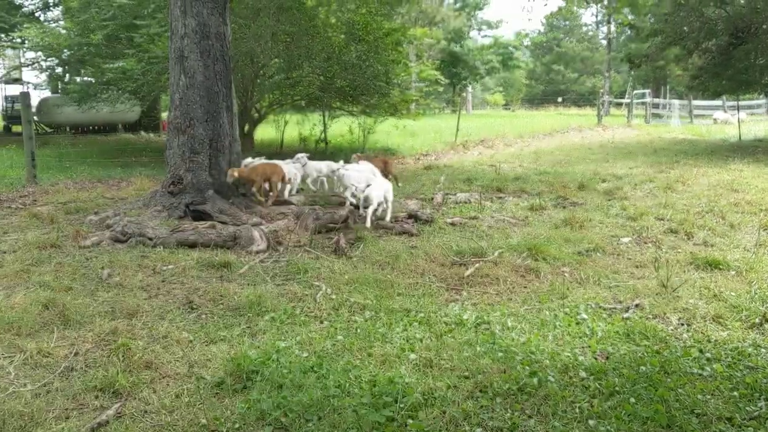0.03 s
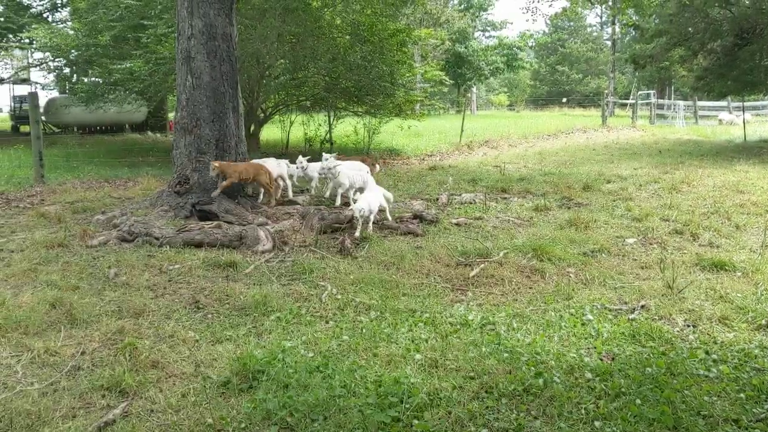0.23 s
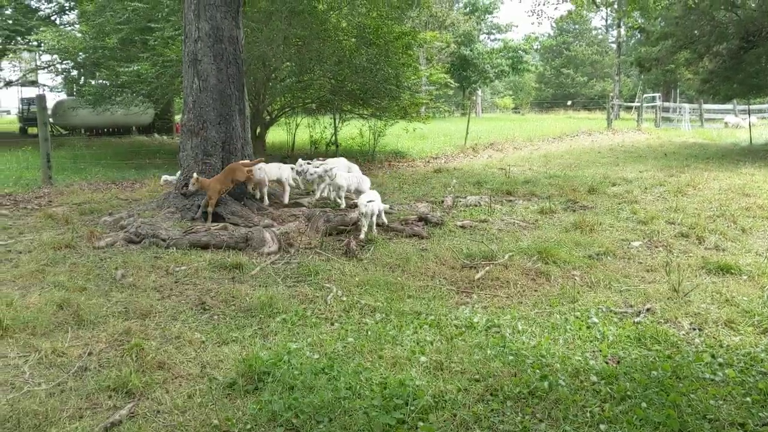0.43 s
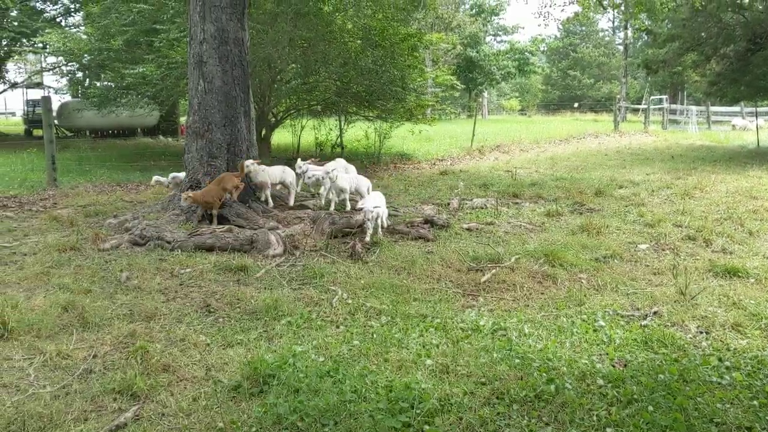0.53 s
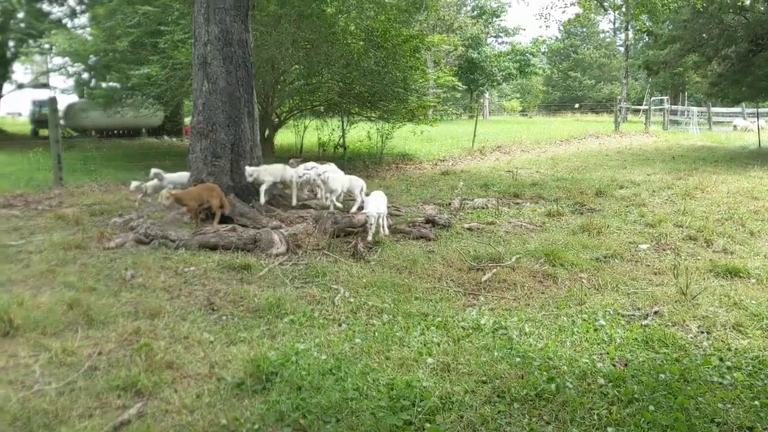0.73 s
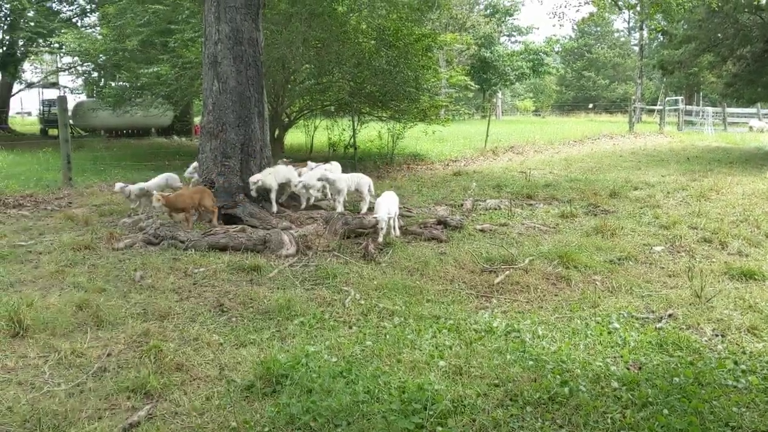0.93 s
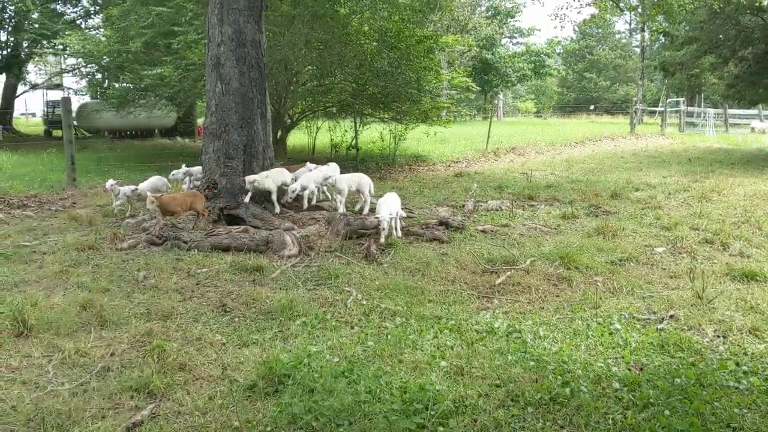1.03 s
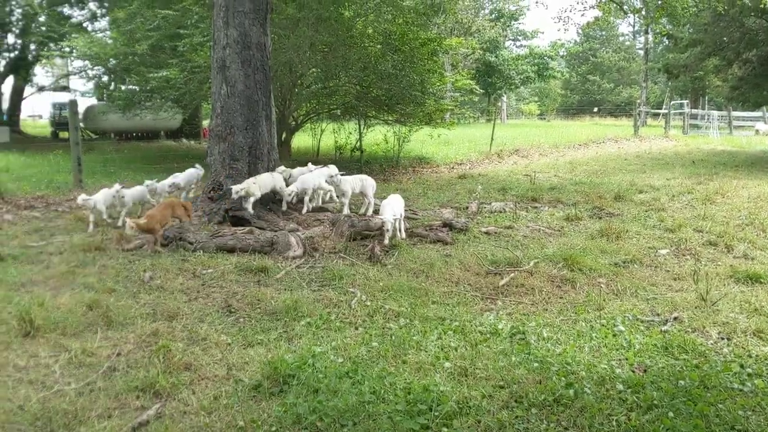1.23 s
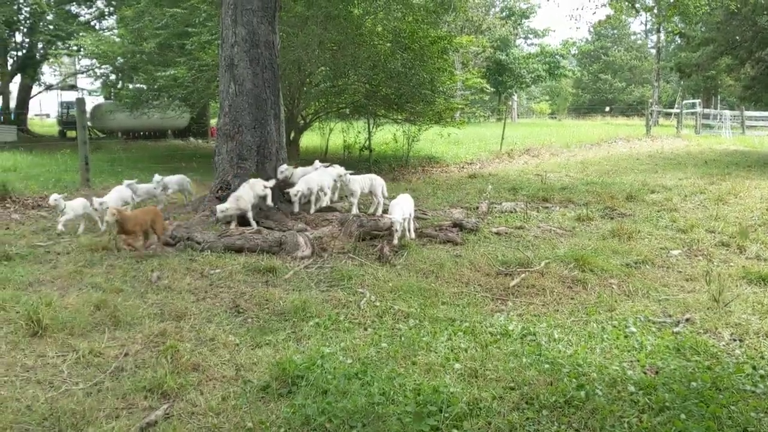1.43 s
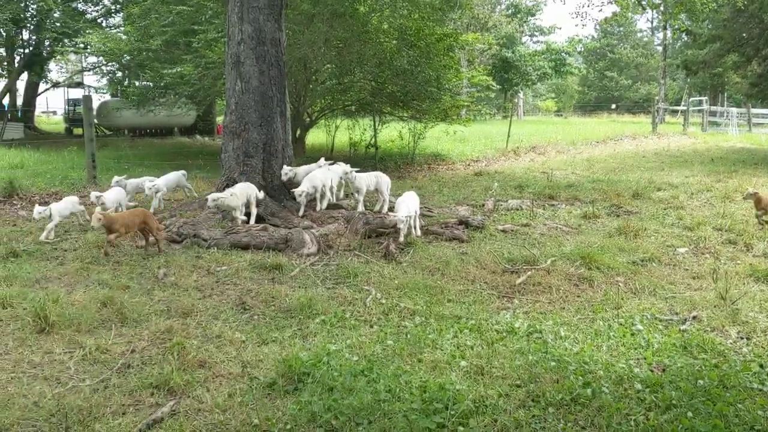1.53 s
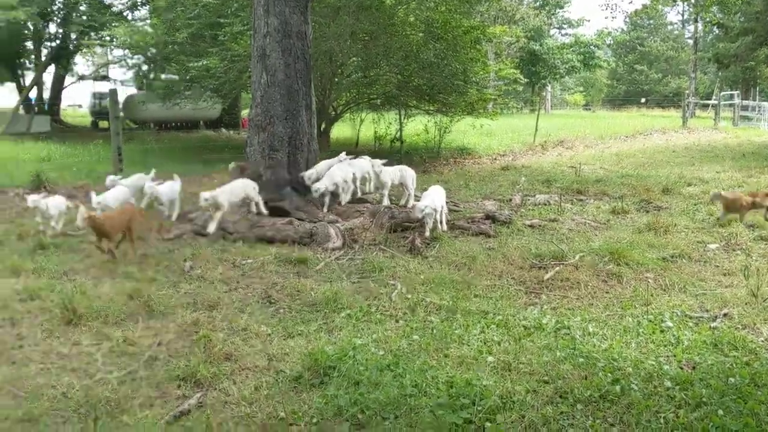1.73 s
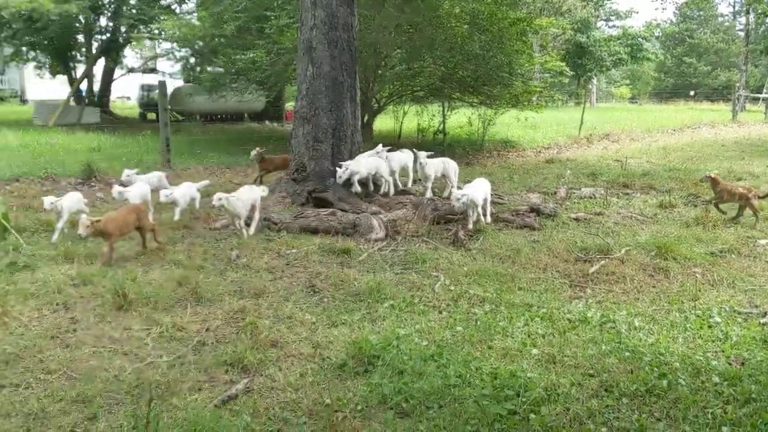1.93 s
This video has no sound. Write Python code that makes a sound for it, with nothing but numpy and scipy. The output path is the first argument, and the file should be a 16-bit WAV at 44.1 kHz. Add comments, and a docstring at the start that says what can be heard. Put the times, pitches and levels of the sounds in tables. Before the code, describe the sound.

A lamb gives a quavering bleat, then a farther one answers in a quiet pasture.

```python
"""Two lambs bleat to the left in a pasture ringed by trees: a near one with a quaver, then a farther,
steadier one. Each bleat is a source and a filter: glottal pulses and puffs of air excite the resonances
of throat and mouth, and ground and trees reflect the sound. A distant bird whistles one phrase twice,
insects stridulate in the grass, and hooves thud softly over a low outdoor rumble."""
import sys
import numpy as np
from scipy import signal
from scipy.fft import rfft, irfft
from scipy.io import wavfile
from scipy.ndimage import uniform_filter1d

SR = 44100
rng = np.random.default_rng(int(sys.argv[2]) if len(sys.argv) > 2 else 0)


def dump_mix(stems):
    """Bounce the given channels to the path in sys.argv[1] as a 16-bit WAV at rate SR."""
    frames = np.atleast_2d(stems).T  # one column per channel
    limited = np.clip(frames, -1, 1)  # hard clip at full scale
    pcm = np.round(limited * 32767).astype(np.int16)
    wavfile.write(sys.argv[1], SR, pcm)


N = 88200
T, HZ = np.arange(N) / SR, np.fft.rfftfreq(N, 1 / SR)


def amp(db):
    """Amplitude ratio of a level in decibels."""
    return 10 ** (np.asarray(db) / 20)


def unit_rms(x):
    """Normalisation to rms 1."""
    return x / np.sqrt(np.mean(x ** 2) + 1e-20)


def at_freq(points, hz):
    """Interpolation of a table on a log-frequency axis."""
    f, value = np.transpose(points)
    return np.interp(np.log(hz + 1), np.log(f + 1), value)


def curves(rows):
    """Linear interpolation of each column of a time table."""
    times, *columns = np.transpose(rows)
    return [np.interp(T, times, column) for column in columns]


def gate(start, end, edge_s=0.0032):
    """Trapezoidal window between two times."""
    return np.clip(np.minimum(T - start, end - T) / edge_s, 0, 1)


def noise(gain):
    """Spectrally shaped Gaussian noise of rms 1."""
    return unit_rms(irfft(rfft(rng.standard_normal(N)) * gain, N))


def wander(rate_hz):
    """Random modulation: low-pass noise of rms 1."""
    return noise(1 / (1 + (HZ / rate_hz) ** 4))


def highpass(x, hz):
    """Steep zero-phase high-pass."""
    return irfft(rfft(x) / (1 + (hz / (HZ + 1)) ** 16), N)


def delay(x, seconds):
    """Travel time as a linear phase shift."""
    return irfft(rfft(x) * np.exp(-2j * np.pi * HZ * seconds), N) * (T >= seconds)


def colour(x, points):
    """Minimum-phase filter: each pulse rings after it strikes."""
    log_gain = np.log(amp(at_freq(points, abs(np.fft.fftfreq(4096, 1 / SR)))))
    response = np.fft.ifft(np.exp(np.conj(signal.hilbert(log_gain)))).real[:2048]
    return signal.fftconvolve(x, response)[:N]


def resonate(x, hz, width_hz):
    """Damped resonator whose centre follows the curve hz."""
    carrier = np.exp(2j * np.pi * np.cumsum(hz) / SR)
    pole = np.exp(-np.pi * width_hz / SR)
    return 2 * (carrier * signal.lfilter([1 - pole], [1, -pole], x / carrier)).real


# Spectral density of the outdoor air: f/Hz, relative level/dB
AIR_SPECTRUM = [(20, 2), (40, 0), (70, 2), (130, -4), (220, -9.5), (400, -12.5), (800, -19), (1600, -22),
                (3200, -20.5), (5700, -19.5), (6500, -24), (9000, -24.5), (12000, -26), (15500, -27)]
# Likeness of the two channels: f/Hz, correlation
AIR_CORRELATION = [(60, 0.93), (150, 0.9), (300, 0.086), (700, 0.31), (2000, 0.068), (10000, 0.067)]
# Left minus right: f/Hz, level/dB
AIR_LEAN = [(100, 0.25), (400, 4.8), (2000, 2.6), (5000, 7.2), (12000, 8.9)]


def air(level_db=-59.5, patch_db=1.8):
    """Partial coherence: both channels share a low rumble, but little of the patchy rustle of leaves."""
    frames, hz = N // 256 + 5, np.fft.rfftfreq(1024, 1 / SR)
    a, b, c, d, patches = rng.standard_normal((frames, 513, 5)).T
    patches = unit_rms(uniform_filter1d(uniform_filter1d(patches, size=12, axis=0), size=12, axis=1))
    correlation = at_freq(AIR_CORRELATION, hz)[:, None]
    left = a + 1j * b
    right = correlation * left + np.sqrt(1 - correlation ** 2) * (c + 1j * d)
    lean = amp(at_freq(AIR_LEAN, hz) / 2)[:, None]
    spectra = np.array([left * lean, right / lean])
    spectra *= amp(at_freq(AIR_SPECTRUM, hz)[:, None] + patch_db * patches)
    return amp(level_db) * unit_rms(signal.istft(spectra, nperseg=1024, noverlap=768)[1][:, :N])


# Hoof strikes: t/s, level/dB, centre f/Hz
HOOF_STRIKES = [(0.126, -67.5, 420), (0.361, -61.5, 590), (.435, -53, 920), (.584, -54.5, 200),
                (0.597, -68, 540), (.988, -54, 191), (1.224, -56, 204), (1.291, -57.5, 236),
                (1.387, -62.5, 170), (1.532, -58, 215)]


def hooves(rise_s=0.0049, width_octaves=.45):
    """Damped impact: each knock on turf and roots is a short, dull burst of band noise."""
    thuds = np.zeros(N)
    for start, db, hz in HOOF_STRIKES:
        age = np.maximum(T - start, 0) / rise_s
        band = np.exp(-.5 * (np.log2((HZ + 1) / hz) / width_octaves) ** 2)
        thuds += amp(db) * age * np.exp(1 - age) * noise(band)
    return thuds * amp([[1.5], [-1.5]])


# Envelope of the insect chorus: t/s, relative level/dB
CHORUS_SWELL = [(0, -62.5), (.1, -61.5), (.17, -63), (.8, -63), (.93, -64), (1.01, -60), (1.12, -65.5),
                (1.22, -60.5), (1.33, -65), (1.55, -64.5), (1.83, -63), (2, -62)]
# One insect's chirp peaks: t/s, relative level/dB
CHIRP_PEAKS = [(.08, -68), (0.876, -68), (1.083, -63), (1.27, -65), (1.42, -70), (1.58, -66), (1.754, -64),
               (1.896, -64.5)]


def insects(chorus_hz=9670, chirp_hz=10770, chirp_s=0.014, flutter_db=0.4):
    """Stridulation as modulated narrow-band noise: a sizzling chorus, and one insect chirping above it."""
    def band(hz, width_hz):
        return noise(1 / (1 + ((HZ - hz) / width_hz) ** 2 / 2) ** 2)

    chirps = sum(amp(db) * np.exp(-.5 * ((T - peak) / chirp_s) ** 2) for peak, db in CHIRP_PEAKS)
    chorus = amp(curves(CHORUS_SWELL)[0] + flutter_db * wander(77))
    sides = [chorus * band(chorus_hz, 500) + chirps * band(chirp_hz, 350) for _ in range(2)]
    return amp([[4], [-7]]) * np.array(sides)


# Reverberation time of the tree line: f/Hz, T60/s
TREE_DECAY = [(300, 0.1), (1500, 1.0), (3500, 0.77), (6000, 0.65), (12000, 1.1)]
# Colour of its echoes: f/Hz, gain/dB
TREE_RESPONSE = [(300, -1), (900, 1.5), (1400, 2), (2200, -5.5), (3450, -6), (6000, 3.5), (9000, -10),
                 (15000, -19)]


def trees(x, stir_rad=1.7, stir_hz=19):
    """Diffuse scattering, unrelated in the two channels; moving leaves modulate the echoes' phase."""
    taps = rng.standard_normal((2, SR)) * (rng.random((2, SR)) < .05)
    taps *= np.minimum(T[:SR] / 0.0026, 1)
    hz, t, spectra = signal.stft(taps, SR, nperseg=256)
    spectra *= amp(-60 * t / at_freq(TREE_DECAY, hz)[:, None])
    tail = signal.istft(spectra, SR, nperseg=256)[1]
    tail /= np.linalg.norm(tail, axis=1, keepdims=True)
    stirred = (signal.hilbert(x) * np.exp(1j * stir_rad * wander(stir_hz))).real
    return signal.fftconvolve(colour(stirred, TREE_RESPONSE)[None], tail, axes=1)[:, :N]


# The bird's phrase, one list per note: t/s within the phrase, f/Hz, relative level/dB
BIRD_NOTES = [
    [(0, 2930, -14), (.012, 2810, 4.5), (.028, 2730, -14)],
    [(.037, 3177, -9), (.055, 3220, 7), (.073, 3700, -6.5)],
    [(.108, 2228, -6.5), (.15, 2304, 6.5), (.172, 2660, -0.5), (.183, 2670, 11)],
    [(.19, 2884, -9), (.201, 2650, 7.5), (.214, 2565, -2)],
    [(.245, 2203, -6.5), (.272, 2250, 4), (.32, 2185, -4.5), (.355, 1700, -9)],
]
# Phrase onsets: t/s, level/dB, pitch factor, length factor
BIRD_PHRASES = [(1.084, -59, 1., 1.), (1.55, -55, 0.98, 1.01)]


def bird(flutter=.25, flutter_hz=90, reverb_db=-3.5):
    """Multipath fading: five gliding whistles, sung twice, flutter on the long way through the leaves."""
    song = np.zeros(N)
    for start, db, pitch, stretch in BIRD_PHRASES:
        for note in BIRD_NOTES:
            rows = [(start + t * stretch, hz * pitch, db + level) for t, hz, level in note]
            hz, level_db = curves(rows)
            song += gate(rows[0][0], rows[-1][0]) * amp(level_db) * np.sin(2 * np.pi * np.cumsum(hz) / SR)
    fading = 1 + flutter * (wander(flutter_hz) + 1j * wander(flutter_hz))
    song = (signal.hilbert(song) * fading).real
    return song * amp([[3.5], [-3.5]]) + amp(reverb_db) * trees(song)


def grass(x, decay_s=0.0035):
    """Ground scattering: a few milliseconds of treble fill the gaps between pulses."""
    burst = rng.standard_normal(N) * np.exp(-T / decay_s) * gate(.0005, 1, edge_s=.001)
    scatter = highpass(burst, hz=2500)[:4096]
    return signal.fftconvolve(x, scatter / np.linalg.norm(scatter))[:N]


# Right channel relative to left: f/Hz, gain/dB
RIGHT_SHADOW = [(100, -16), (400, -7), (750, -19), (1300, -8), (2400, -3.5), (4400, -15), (8000, -7.5),
                (15000, -18)]
# Echoes from ground and trunks: delay t/s, left gain/dB, right gain/dB
REFLECTIONS = [(0.012, -13, -17), (.031, -24, -21.5), (.058, -16, -32.5), (.104, -27, -33)]


def pasture(x, right_lag_s=0.00017, reverb_db=-13.5, wood_db=-23):
    """Shadowing and reflection: a call reaches the right later and weaker; ground and trees answer."""
    sides = np.array([x, delay(colour(x, RIGHT_SHADOW), right_lag_s)])
    sides += amp([[-4.5], [-6.5]]) * np.array([grass(side) for side in sides])
    for delay_s, left_db, right_db in REFLECTIONS:
        sides += amp([[left_db], [right_db]]) * delay(x, delay_s)
    far_wood = amp(wood_db) * delay(x - highpass(x, hz=1670), seconds=0.35)
    return sides + amp([[0], [-5]]) * trees(amp(reverb_db) * x + far_wood)


def glottis(pitch_hz, roughness, jitter=0.029, shimmer=0.091, breath=2.6, puff_cycles=.3):
    """Phonation: each cycle gives a sharp pulse and a puff of air; roughness adds jitter and rasp."""
    hz = pitch_hz * (1 + jitter * roughness * wander(120))
    cycles = np.cumsum(hz) / SR
    samples_from_pulse = ((cycles + .5) % 1 - .5) * SR / hz
    pulses = unit_rms(np.sinc(samples_from_pulse) * np.cos(np.pi * cycles) ** 2)
    puffs = unit_rms(np.exp(-(cycles % 1) / puff_cycles) * rng.standard_normal(N))
    rasp = highpass(breath * puffs + shimmer * pulses * wander(220), hz=3130)
    return pulses, roughness * rasp


def bleat(voice, effort, throat, treble_hz, depth_hz, quaver_hz=14.4, crest_s=.343):
    """Source-filter model: the glottis drives fixed throat resonances and two that follow the pitch."""
    steady_hz, roughness = curves(voice)
    level_db, treble_db, mouth_db = curves(effort)
    quaver = depth_hz * np.cos(2 * np.pi * quaver_hz * (T - crest_s))
    pitch_hz = steady_hz + quaver
    pulses, rasp = glottis(pitch_hz, roughness)
    ring = 0.91 * resonate(pulses, 8 * pitch_hz, width_hz=440)  # piercing eighth harmonic
    voiced = colour(pulses + ring + rasp, throat)
    treble = highpass(voiced, treble_hz)
    mouth_hz = 4.1 * steady_hz
    mouth = resonate(resonate(pulses, mouth_hz, width_hz=124), mouth_hz, width_hz=124)
    calling = gate(effort[0][0], effort[-1][0])
    middle, treble, mouth = [band / np.sqrt(np.average(band ** 2, weights=calling))
                             for band in (voiced - treble, treble, mouth)]
    waver_db = 3.5 * roughness * wander(26)
    tremolo_db = 0.5 * quaver / (np.max(depth_hz) + 1)
    envelope = calling * amp(level_db + waver_db + tremolo_db)
    return envelope * (middle + amp(treble_db) * treble + amp(mouth_db) * mouth)


# Vocal fold vibration: t/s, fundamental f/Hz, roughness (0-1)
NEAR_FOLDS = [(.19, 332, 0.21), (.23, 359, 0.18), (.28, 387.6, .19), (.335, 406.2, 0.14),
              (.39, 413.1, 0.13), (.47, 433, 0.16), (.53, 429.9, .11), (.6, 438.7, 0), (.68, 433.2, .03),
              (.717, 423.2, .05), (.76, 359, 0.37)]
FAR_FOLDS = [(1.34, 301.7, 0.33), (1.384, 342.3, .13), (1.41, 354.8, 0.07), (1.456, 370.2, 0.09),
             (1.61, 373.5, 0.05), (1.68, 374.7, .11), (1.78, 365.6, 0.24), (1.88, 346, 0.21)]
# Vocal effort: t/s, relative level/dB, treble/dB and mouth resonance/dB (both re the middle band)
NEAR_LEVELS = [(0.182, -77, 14, -15), (0.204, -51.5, 0.5, -12), (.225, -46, 1, -18), (.25, -45.5, 4.5, -10),
               (0.279, -39.5, 3, -16), (.35, -36, -2, -25), (0.421, -34.5, -5.5, -29),
               (.5, -33.5, -6.5, -23.5), (.59, -32.5, -7.5, -45), (.635, -34, -10.5, -19),
               (0.674, -36, -5, -23), (.72, -36.5, -6, -16), (.742, -40, -9.5, -9.5), (0.76, -54, -7, -21)]
FAR_LEVELS = [(1.335, -72, -4, -23), (1.365, -55, -3.5, -26), (1.4, -53, -1, -22), (1.45, -51, -4, -24),
              (1.54, -52.5, -2, -36), (1.63, -53.5, -5.5, -35), (1.69, -56, -5.5, -26.5),
              (1.791, -59, -7, -15), (1.89, -68, -6, -20)]
# Response of throat and mouth: f/Hz, gain/dB
NEAR_TRACT = [(200, -60), (430, -24), (860, -16.5), (1300, -13.5), (1750, -15.5), (2150, -14), (2600, -12),
              (2950, -7.5), (3420, -.5), (3900, -10), (4300, -4.5), (4750, -0.5), (5200, 0.5), (5620, 3.5),
              (6500, -9), (7500, -5), (8400, -11), (9300, -3.5), (10900, -11), (11900, -7.5),
              (13200, -15.5), (15500, -20)]
FAR_TRACT = [(200, -53), (370, -13), (740, -17.5), (1110, -17), (1480, -21), (1850, -15), (2230, -12.5),
             (2600, -17.5), (2980, -1), (3700, -7.5), (4120, 6.5), (4800, -4.5), (5250, 0.5), (5600, -3),
             (5950, -7), (6600, -27.5), (7400, -15), (10000, -17), (15500, -32.5)]
# Depth of the near lamb's quaver: t/s, pitch deviation f/Hz
QUAVER_DEPTH = [(.22, 3.4), (.29, 4.5), (.345, 12.6), (.48, 6.8), (.6, 2.14)]


def lambs():
    """Frequency modulation makes the near lamb quaver; the farther one follows on a steadier pitch."""
    near = bleat(NEAR_FOLDS, NEAR_LEVELS, NEAR_TRACT, treble_hz=6850, depth_hz=curves(QUAVER_DEPTH)[0])
    far = bleat(FAR_FOLDS, FAR_LEVELS, FAR_TRACT, treble_hz=4580, depth_hz=0)
    return pasture(amp(3) * near + amp(4) * far)


def scene():
    """Superposition: all sources add, as left and right channels."""
    return lambs() + bird() + insects() + hooves() + air()


def record(dry, cutoff_hz=15850):
    """Band limiting by a linear-phase low-pass."""
    lowpass = signal.firwin(511, cutoff_hz, window=("kaiser", 9), fs=SR)
    return signal.oaconvolve(dry, lowpass[None], "same")


dry = scene()
out = record(dry)
dump_mix(out)
```